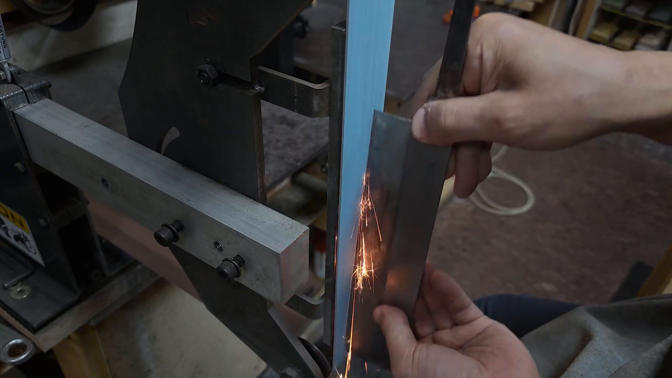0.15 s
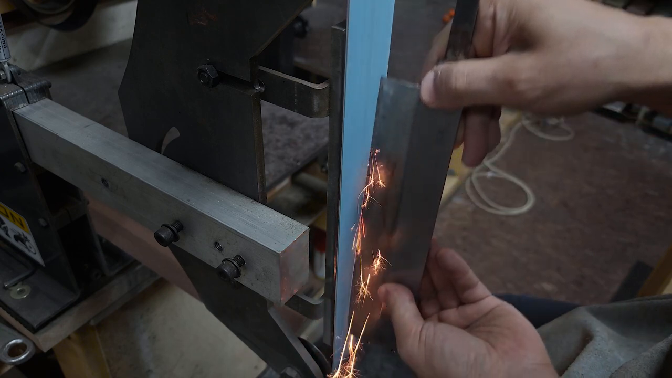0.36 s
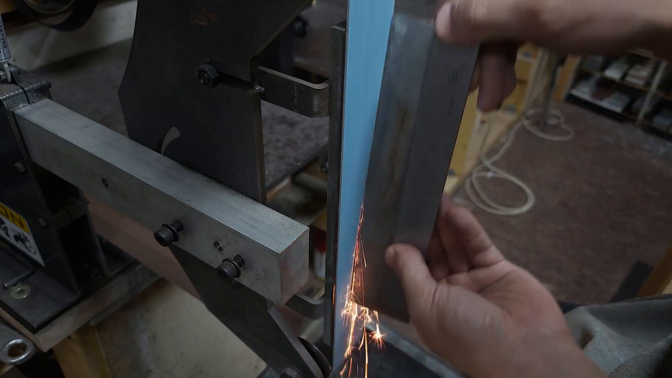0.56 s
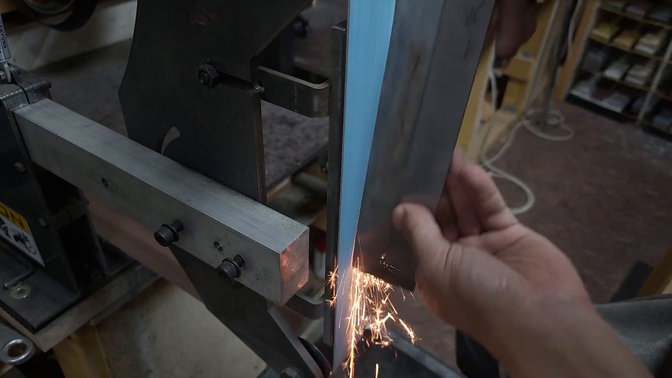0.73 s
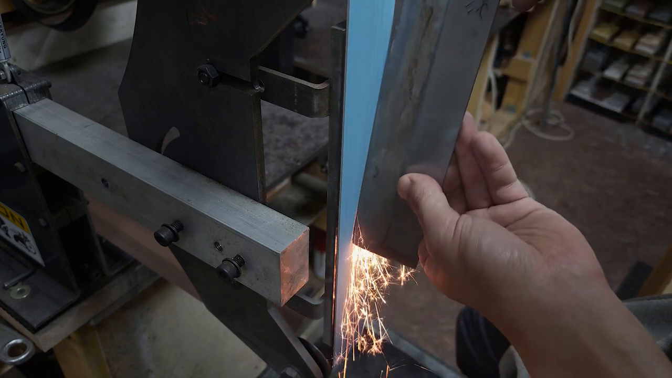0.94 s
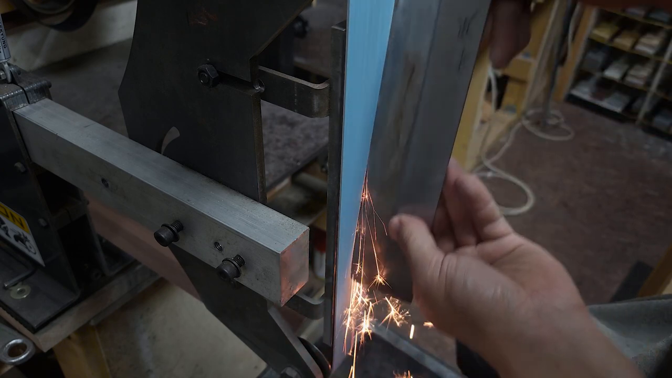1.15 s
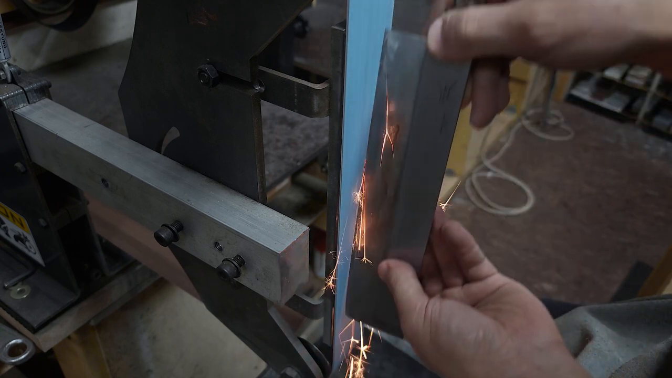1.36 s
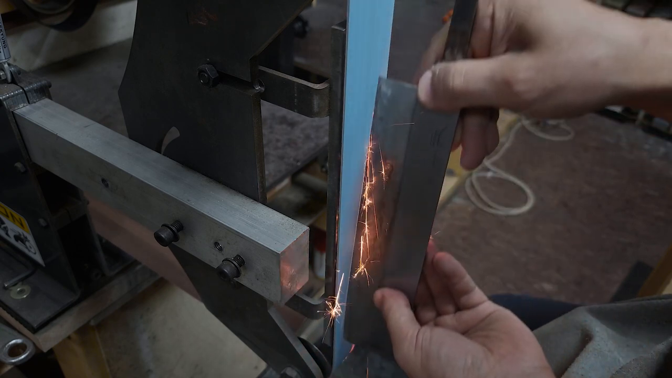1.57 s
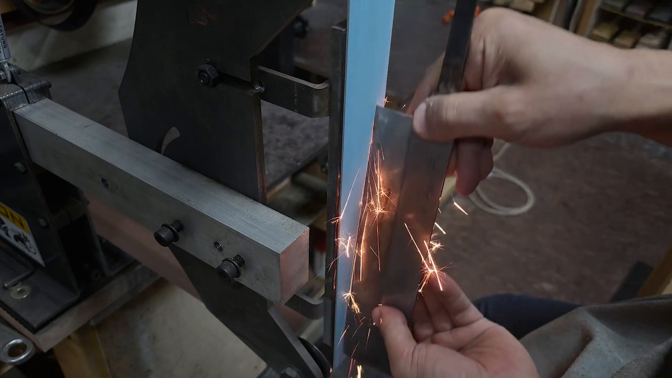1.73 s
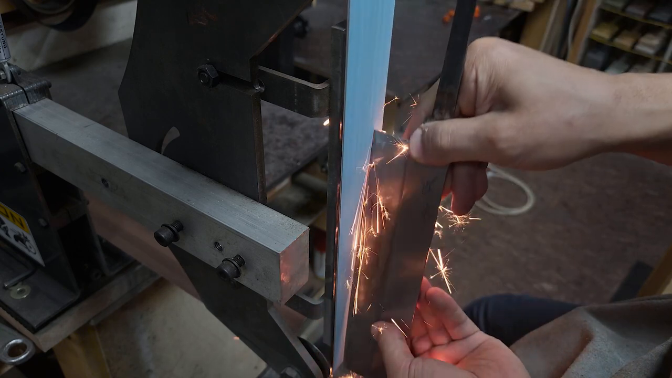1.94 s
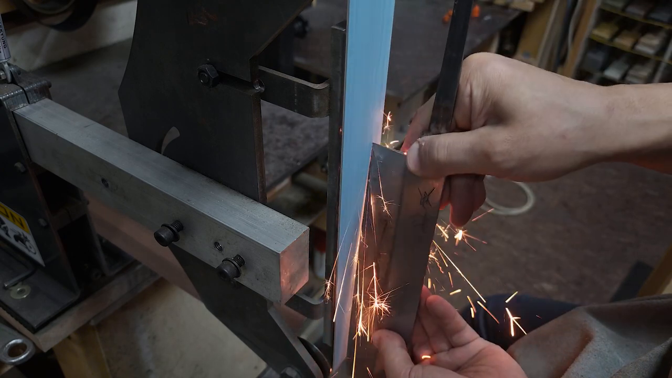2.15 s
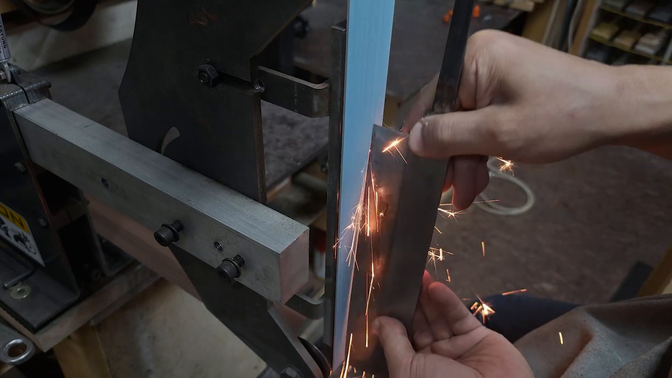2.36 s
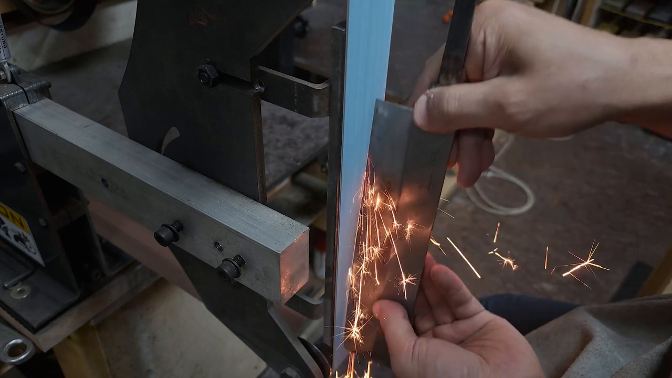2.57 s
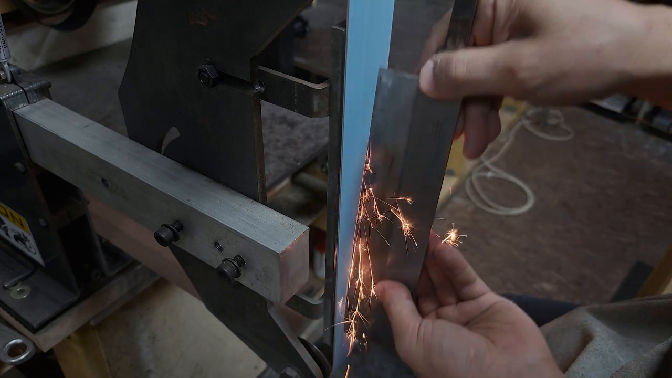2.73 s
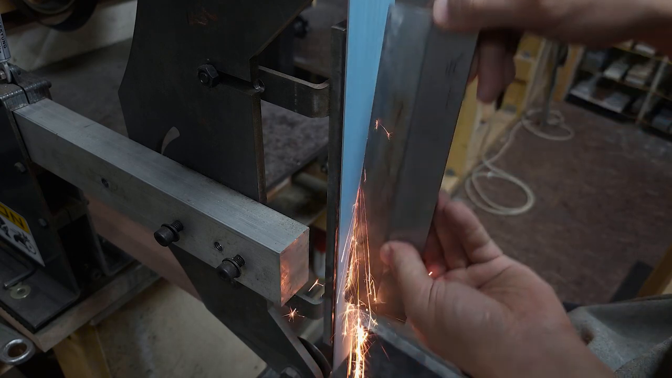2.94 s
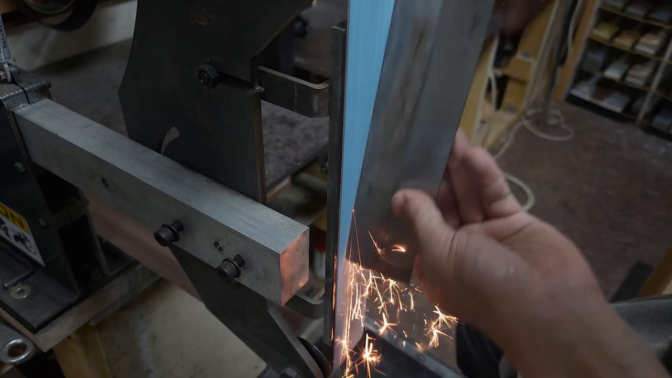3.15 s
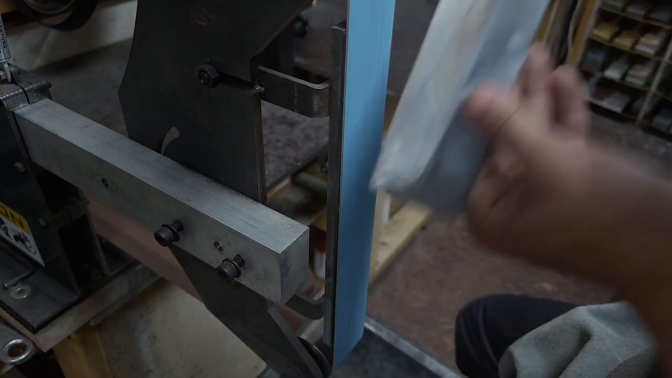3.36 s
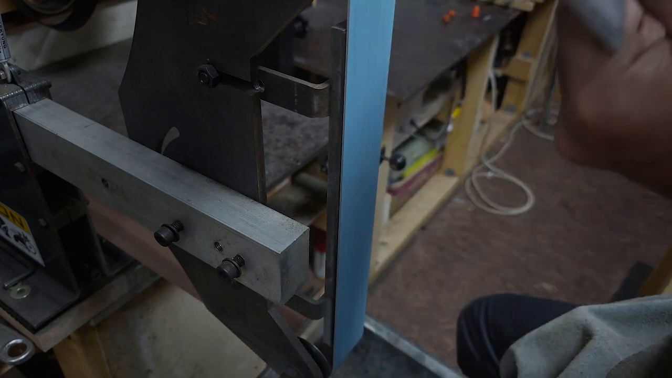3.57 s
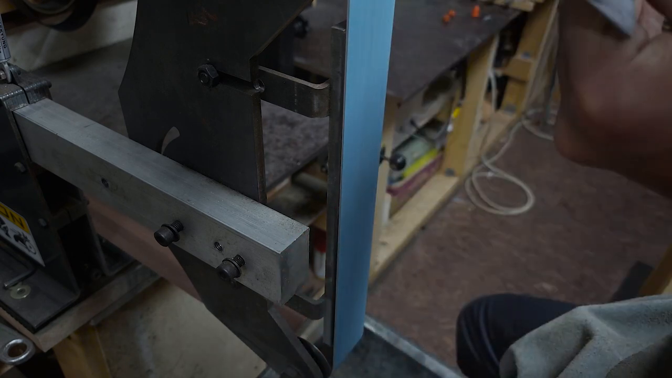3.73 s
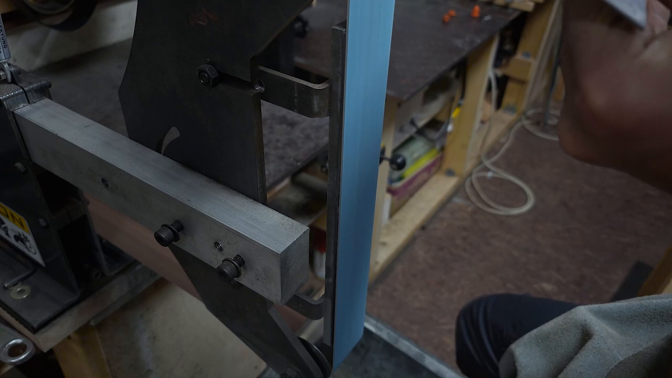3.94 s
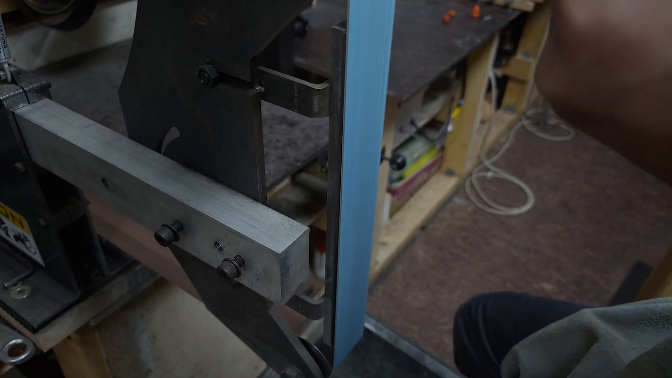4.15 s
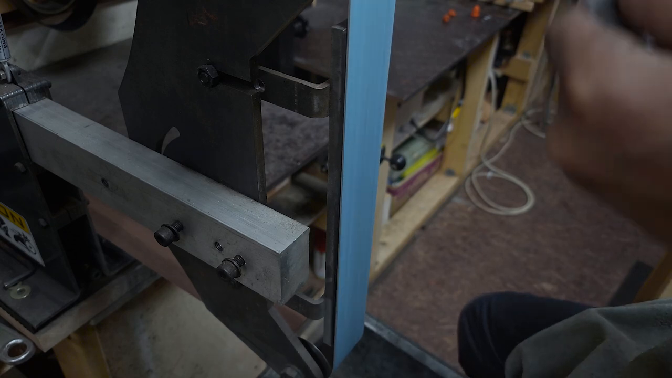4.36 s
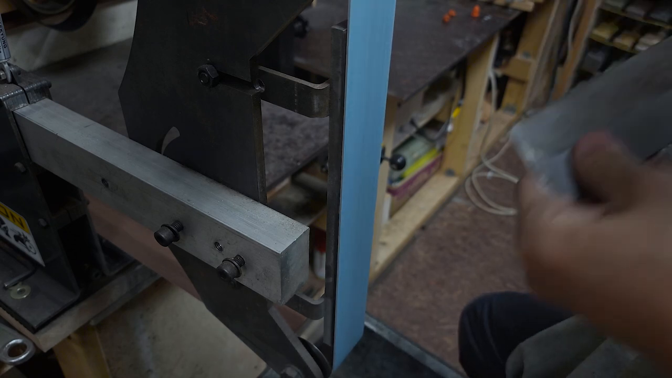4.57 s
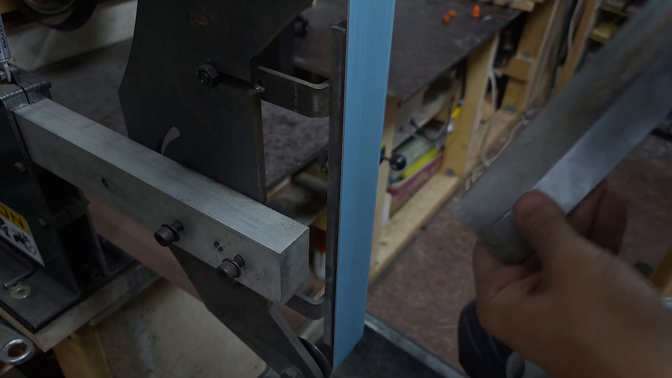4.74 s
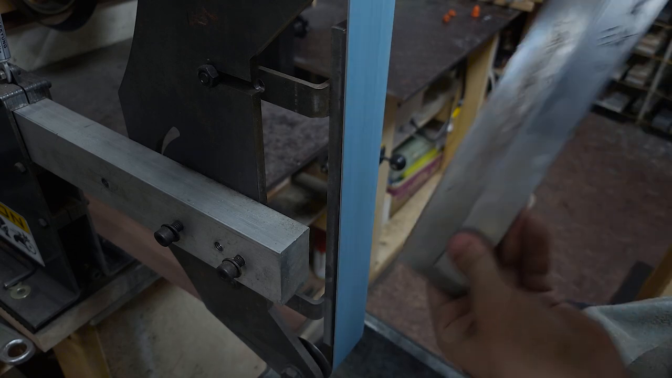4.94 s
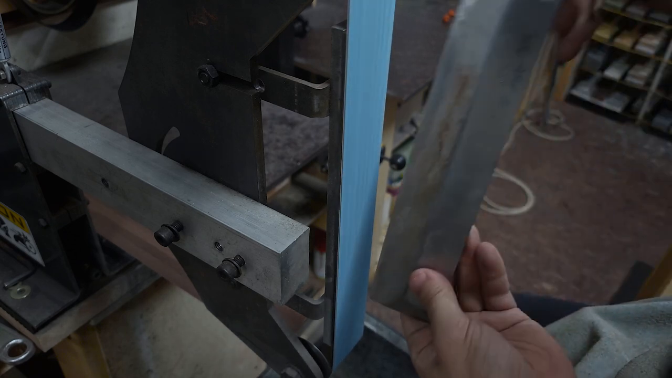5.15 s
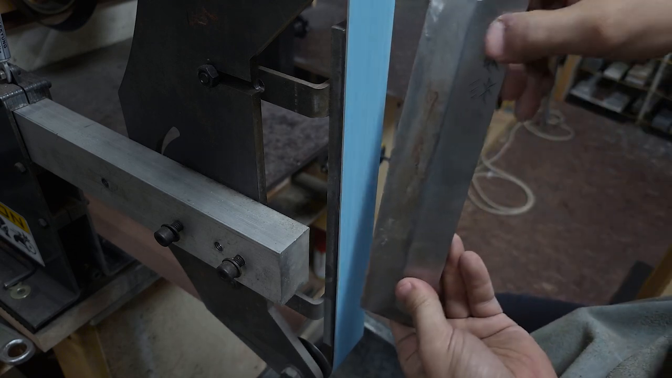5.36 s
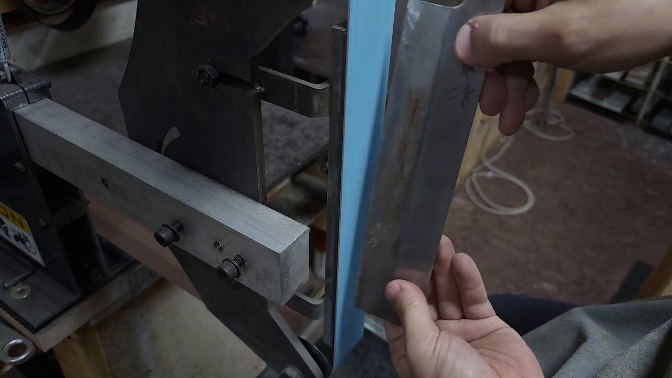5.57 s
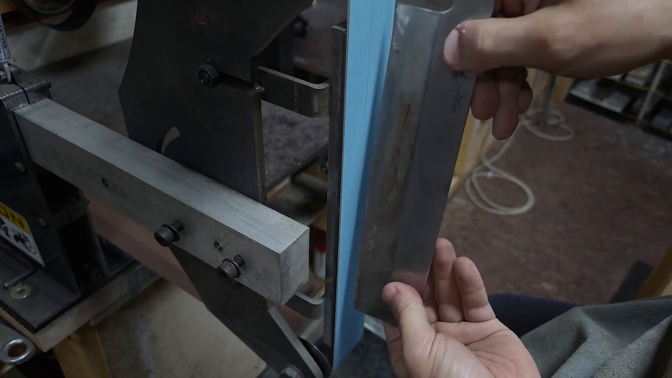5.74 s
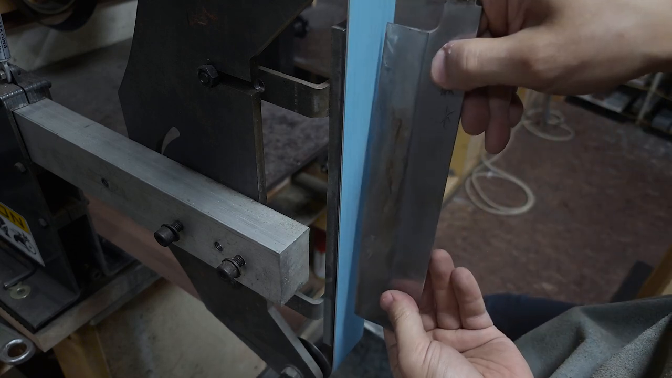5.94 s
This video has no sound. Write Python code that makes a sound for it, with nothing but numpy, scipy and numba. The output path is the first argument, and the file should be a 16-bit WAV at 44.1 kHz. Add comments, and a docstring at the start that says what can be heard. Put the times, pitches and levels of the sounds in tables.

```python
"""In a workshop, a steel blade is drawn along a running belt grinder, close to a camera's microphone.
Grit tears at the steel and makes it ring; the tone shifts as the belt touches it nearer its end or its
middle. The plate behind the belt drums, with a few soft bumps and dry knocks. Then the blade is lifted
off, and the camera's automatic volume slowly brings up the belt's hiss, motor hum and drive whine."""
import sys
import numpy as np
from scipy import signal
from scipy.fft import rfft, irfft, next_fast_len
from scipy.io import wavfile
from scipy.ndimage import uniform_filter1d, map_coordinates
from numba import njit

SR = 44100
rng = np.random.default_rng(int(sys.argv[2]) if len(sys.argv) > 2 else 0)


def master_out(mix):
    """Clip the mix to full scale and print it as 16-bit PCM to the path in sys.argv[1]."""
    frames = np.transpose(np.atleast_2d(mix))
    ceiling = np.clip(frames, -1, 1)
    pcm = np.round(ceiling * 32767).astype(np.int16)
    wavfile.write(sys.argv[1], SR, pcm)


N = 269010
TIME = np.arange(N) / SR

# Levels in a table are relative: they compare its rows with one another.
# where the belt touches the blade: (time [s], place [0 = blade's end, 1 = its middle])
CONTACT_PATH = [(0, 0.76), (0.58, 0.54), (0.87, 0.054), (1.07, 0.03), (1.18, 0.24), (1.55, 0.49), (1.9, 1),
                (2.2, 0.98), (2.55, 0.78), (2.92, 0.61), (3.1, 0.24)]
# the hand leans in or slackens: (time [s], pressure change [dB], bending change [dB], length [s])
HAND_LEANS = [(0.0, 1, -3.5, 0.12), (0.33, 0.5, 3.5, 0.25), (0.737, 0, 4.5, 0.099), (1.02, -2, 0, .12),
              (1.182, -1, 7, 0.034), (1.354, -2.5, -1.5, 0.16), (2.08, -0.5, 4, 0.037),
              (2.15, -3.5, 0, 0.045), (2.263, -1.5, 5, 0.038), (2.675, 1, 3.5, 0.092),
              (3.015, -1.5, -1, 0.1)]
# the belt's bite changes for a moment, mostly deeper: (time [s], force change [dB])
BELT_BITES = [(.113, 1.5), (1.152, -1), (1.207, 1), (1.645, 1.5), (1.694, 2), (1.792, 2.5), (2.187, 6),
              (2.531, 5), (2.835, 2.5), (3.068, 1), (3.11, 3.5), (3.188, 5)]
# four spots along the blade: (place [0 = end, 1 = middle])
BLADE_SPOTS = [0, .25, .5, 1]
# the blade's ringing tones: (pitch [Hz], width [Hz], then a level [dB] for contact at each of the spots)
BLADE_TONES = [(1354, 34, -36, -36, -29, -36), (1662, 39, -26, -24, -24, -15),
               (1910, 46, -30, -30, -22, -32), (2420, 29, -23, -17, -16, -25),
               (2626, 38, -17, -18, -20, -13), (3092, 56, -25, -19, -18, -24),
               (3453, 64, -27, -27, -22, -22), (3779, 62, -36, -35, -16, -36),
               (4265, 40, -32, -23, -15, -20), (4872, 155, -13, -18, -16, -27),
               (5246, 78, -15, -15, -18, -20), (5594, 266, -13, -24, -14, -12),
               (6003, 86, -8, -6, -15, -14), (6630, 111, -5, -8, -6, -8), (7165, 68, -12, -11, -10, -16),
               (7295, 55, -35, -13, -7, -16), (7868, 271, -19, -22, -10, -10),
               (8355, 89, -31, -23, -20, -18), (8778, 122, -13, -23, -11, -10),
               (9201, 49, -18, -26, -24, -20), (9765, 107, -18, -17, -14, -22),
               (10474, 290, -17, -13, -16, -18), (10932, 97, -19, -17, -21, -16),
               (11504, 133, -21, -26, -16, -19), (12303, 152, -19, -25, -12, -32),
               (12632, 368, -22, -16, -20, -10), (13711, 125, -18, -24, -18, -13),
               (14246, 273, -19, -16, -24, -36), (14837, 122, -31, -18, -22, -13),
               (15244, 306, -7, -15, -18, -21)]
# the scratch of steel chips tearing off: (frequency [Hz], level [dB])
CHIP_SPECTRUM = [(600, -62), (1100, -5), (2000, -2.5), (3500, -5), (5500, -2.5), (7500, 0.5),
                 (10000, 1), (15500, -4)]
# the ringing tones of the plate behind the belt: (pitch [Hz], width [Hz], level [dB])
PLATE_TONES = [(203, 104, -7.5), (283, 44, -4), (429, 28, -3.5), (497, 110, -12.5), (643.5, 32, -2),
               (825, 80, -5)]
# the hiss of the running belt and wheels: (frequency [Hz], level [dB])
HISS_SPECTRUM = [(24, -37), (40, -24), (91, -19), (108, -16), (129, -7.5), (218, -18), (438, -9.5),
                 (637, -16), (1220, -14), (3650, -11), (7520, -10), (8110, -10), (9890, -20), (12400, -15),
                 (15500, -25)]
# the ringing tones of the frame and wheels: (pitch [Hz], width [Hz], level [dB])
FRAME_TONES = [(58, 11, -79), (138, 22, -83), (308, 66, -72.5), (457.6, 22, -65), (723, 60, -70),
               (1223, 12, -66), (1573, 270, -59), (2950, 310, -57.5), (3620, 7.7, -61), (3830, 660, -61.5),
               (6940, 160, -60), (8100, 700, -71)]
# the motor's hum and the whine of its speed drive: (pitch [Hz], level [dB])
MOTOR_TONES = [(63.8, -76), (127.7, -58), (141.5, -73), (187.4, -69), (7897, -66), (7957, -62), (8000, -61),
               (8043, -64.5), (8064, -80), (8150, -63.5), (11936, -59), (12064, -66)]
# soft low bumps while the blade is on the belt: (time [s], level [dB])
LOW_BUMPS = [(0.117, -65.5), (0.196, -58), (0.248, -53), (0.305, -58.5), (0.609, -60), (0.738, -57),
             (0.929, -48.5), (0.956, -57), (2.016, -62), (2.121, -53), (2.181, -55), (2.497, -57),
             (2.532, -56), (2.945, -52), (3.196, -58.5)]
# short ticks: the blade's edge knocks against the belt, and once a bright spark spits off: (time [s], level
# [dB], pitch [Hz], width [Hz])
SHORT_TICKS = [(0.768, -55, 1100, 1800), (1.209, -48, 1500, 1500), (2.209, -29, 13500, 6000),
               (3.113, -42, 900, 1800)]


def undb(db):
    """Turn decibels into a number to multiply by."""
    return 10 ** (np.asarray(db) / 20)


def unit(x):
    """Scale a signal so that its average strength (rms) is 1."""
    return x / np.sqrt(np.mean(x ** 2))


def wander(rate):
    """A smooth random curve of strength 1 that heads for a new value rate times a second."""
    turns = np.arange(0, TIME[-1] * rate + 1, 1 / 8)
    path = map_coordinates(rng.standard_normal(size=4096), [turns], order=2, mode="wrap")
    return unit(np.interp(TIME * rate, turns, path))


def swell(at_s, length_s):
    """A smooth rise to 1 and back, centred on at_s."""
    return np.exp(-2 * ((TIME - at_s) / length_s) ** 2)


@njit
def band_pass(x, hz, width):
    """A filter that lets through the sound near hz; its pitch and width may move."""
    out, band, low = np.empty(len(x)), 0., 0.
    for i in range(len(x)):
        tuning = np.tan(np.pi * hz[i] / SR)
        loss = np.pi * width[i] / SR * (tuning + 1 / tuning)
        swing = (band + tuning * (x[i] - low)) / (1 + tuning * (tuning + loss))
        band = 2 * swing - band
        low = low + 2 * tuning * swing
        out[i] = loss * swing
    return out


def ring(x, hz, width, damping=1):
    """Make x ring at one pitch; less damping gives a purer, longer ring."""
    ones = np.ones(N)
    return band_pass(x, hz * ones, width * damping * ones) * np.sqrt(SR / (np.pi * width)) / damping


def shaped_noise(spectrum):
    """Noise of strength 1, shaped by rows of (frequency [Hz], level [dB])."""
    hz, db = np.transpose(spectrum)
    size = next_fast_len(N)
    bin_hz = np.maximum(np.arange(size // 2 + 1) * SR / size, 1)
    gain = undb(np.interp(np.log(bin_hz), np.log(hz), db))
    return unit(irfft(rfft(rng.standard_normal(size)) * gain, size)[:N])


def contact_place():
    """Where the belt meets the blade, from 0 (its end) to 1 (its middle)."""
    return np.clip(np.interp(TIME, *np.transpose(CONTACT_PATH)), 0, 1)


def touch(ease_s=3.195, lift_s=3.25, ease_db_per_s=117, lift_db_per_s=420):
    """1 while the blade is held on the belt, fading away as it is eased off and lifted."""
    eased_db = ease_db_per_s * np.maximum(TIME - ease_s, 0)
    lifted_db = lift_db_per_s * np.maximum(TIME - lift_s, 0)
    return undb(-np.minimum(eased_db + lifted_db, 200))


def leaning():
    """How far the hand's pressure and the blade's bending stray from their steady values, in dB."""
    pressure_db = sum(db * swell(at_s, length_s) for at_s, db, _, length_s in HAND_LEANS)
    bending_db = sum(db * swell(at_s, length_s) for at_s, _, db, length_s in HAND_LEANS)
    return pressure_db, bending_db


def snags(per_s=130, decay_s=0.0047):
    """Tall grains of grit catch the steel suddenly and let go gradually."""
    catches = (rng.random(N) < per_s / SR) * rng.exponential(size=N)
    drag = signal.lfilter([1], [1, -np.exp(-1 / (decay_s * SR))], catches)
    return unit(drag - drag.mean())


def cutting_force(laps_per_s=12.42, lap_db=0.5, patch_db=-0.21, tremor_db=0.61, snag_share=0.074):
    """The hand's push, varied by its trembling, the belt's worn patches, brief bites and tall grains."""
    lap = TIME * laps_per_s
    # the same 14 patches of belt come round on every lap
    patches = unit(map_coordinates(rng.standard_normal(14), [lap % 1 * 14], order=2, mode="grid-wrap"))
    belt_db = lap_db * np.sin(2 * np.pi * (lap - .11)) + patch_db * patches
    bite_db = sum(db * swell(at_s, length_s=0.013) for at_s, db in BELT_BITES)
    pressure_db, _ = leaning()
    hand_db = -32.5 + pressure_db + tremor_db * wander(24.95)
    return touch() * undb(hand_db + belt_db + bite_db) * (1 + snag_share * snags())


def blade(force, grain_spread_db=4, flare_db=1.36, pitch_drift=0.0019, screech_hz=6003, screech_db=4):
    """Grit strikes the steel; each tone rings by as much as it moves the spot touching the belt."""
    grain_sizes = np.repeat(rng.standard_normal(N // 12 + 1), 12)[:N]  # a new grain every 12 samples
    grains = force * unit(undb(grain_spread_db * grain_sizes))
    place = contact_place()
    _, bending_db = leaning()
    bending = touch() * undb(bending_db - 1.5)
    grips = [wander(9) for _ in range(6)]
    ringing = 0
    for k, (hz, width, *spot_db) in enumerate(BLADE_TONES):
        # the blade rocks in the fingers, so its tones waver in level and pitch
        rock, squeeze = grips[k % len(grips)], grips[(k + 1) % len(grips)]
        response = np.interp(place, BLADE_SPOTS, undb(spot_db)) * undb(flare_db * rock)
        if hz < 3300:  # bending the blade feeds its lowest tones
            response *= bending
        if hz == screech_hz:  # one tone screeches when the contact is a little way in from the end
            response *= undb(screech_db * np.exp(-((place - 0.24) / 0.079) ** 2))
        strikes = grains * rng.standard_normal(N) * response
        ringing += ring(strikes, hz * (1 + pitch_drift * squeeze), width, damping=0.94)
    chip_scratch = undb(-16) * grains * shaped_noise(CHIP_SPECTRUM)
    return ringing + chip_scratch


def stroke_to_end(full_speed=0.3, smooth_s=0.15):
    """Up to 1 as the contact slides to the blade's end; 0 at rest and on the way back."""
    speed = -np.gradient(contact_place()) * SR  # change of place per second
    return uniform_filter1d(np.clip(speed / full_speed, 0, 1), int(smooth_s * SR))


def backing_plate(flat_boost_db=8, stroke_boost_db=5, growl_below_hz=560):
    """The belt, squeezed between blade and plate, makes the plate growl and rattle."""
    lying_flat = np.exp(-((1 - contact_place()) / 0.3) ** 2)  # 1 when the blade's middle is on the belt
    pressure_db, _ = leaning()
    growl = touch() * undb(-52.5 + pressure_db + flat_boost_db * lying_flat)
    rattle = touch() * undb(-54.5 + pressure_db + stroke_boost_db * stroke_to_end())
    out = 0
    for hz, width, db in PLATE_TONES:
        push = growl if hz < growl_below_hz else rattle
        out += undb(db) * ring(push * rng.standard_normal(N), hz, width)
    return out


def running_belt(flutter_db=0.38):
    """The moving belt hisses and sets the frame and wheels ringing; the level flutters a little."""
    hiss = undb(-47) * shaped_noise(HISS_SPECTRUM)
    frame = sum(undb(db) * ring(rng.standard_normal(N), hz, width) for hz, width, db in FRAME_TONES)
    return (hiss + frame) * undb(flutter_db * wander(25))


def motor(whine_above_hz=1000, whine_waver_db=0.5, phase_waver_rad=0.23):
    """The motor hums, and the drive that sets its speed whines as it switches the current."""
    out = 0
    for hz, db in MOTOR_TONES:
        waver_db = whine_waver_db * wander(16) if hz >= whine_above_hz else 0
        phase = 2 * np.pi * hz * TIME + phase_waver_rad * wander(4.6)
        out += np.sqrt(2) * undb(db + waver_db) * np.sin(phase)
    return out


def bumps(hz=50, length_s=0.0036):
    """Each bump is a single soft swing of air pressure."""
    out = 0
    for at_s, db in LOW_BUMPS:
        age = TIME - at_s
        pulse = np.exp(-(age / length_s) ** 2 / 2)
        out += undb(db) * pulse * np.cos(2 * np.pi * (hz * age + rng.random()))
    return out


def knocks(decay_s=0.0074):
    """The blade's edge hits the belt with short, dry cracks, and a spark spits off with a bright tick."""
    out = 0
    for at_s, db, hz, width in SHORT_TICKS:
        fade = (TIME >= at_s) * np.exp(-np.abs(TIME - at_s) / decay_s)
        crack = fade * rng.standard_normal(N)
        out += undb(db) * ring(crack + 1e-18, hz, width)  # the tiny offset keeps the filter fast
    return out


def workshop(x, echo_s=0.13, echo_db=-13):
    """Benches and near walls add a short blur of echoes, which fades by 60 dB in echo_s."""
    age = TIME[:SR // 3]
    tail = rng.standard_normal(len(age)) * np.exp(-np.log(1000) * age / echo_s) * (age > .004)
    return x + undb(echo_db) * signal.fftconvolve(x, tail / np.linalg.norm(tail))[:N]


def scene():
    """All the sounds reach one microphone, so both channels are the same."""
    grinding = undb(12.5) * blade(cutting_force()) + backing_plate() + undb(15.5) * knocks()
    mono = workshop(grinding) + undb(15) * bumps() + running_belt() + motor()
    return np.array([mono, mono])


def automatic_volume(x, limit_db=-30.5, recovery_db_per_s=10, window_s=0.026):
    """The volume drops at once when the sound passes the limit, then creeps back up."""
    power = uniform_filter1d(x[0] ** 2, int(window_s * SR))
    excess_db = np.maximum(10 * np.log10(power + 1e-12) - limit_db, 0)
    recovery_db = recovery_db_per_s * TIME
    return x * undb(recovery_db - np.maximum.accumulate(excess_db + recovery_db))


def record(dry):
    """The camera sets its own volume and cuts the treble above 15750 Hz."""
    treble_cut = signal.ellip(10, .2, 75, 15750, fs=SR, output="sos")
    return signal.sosfilt(treble_cut, automatic_volume(dry))


dry = scene()
out = record(dry)
master_out(out)
```